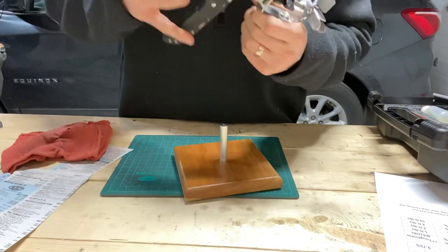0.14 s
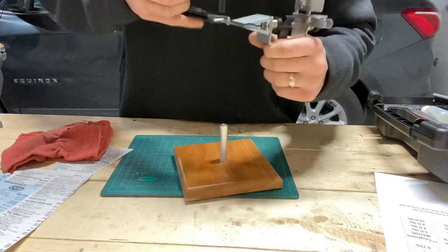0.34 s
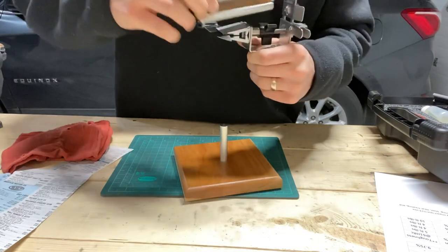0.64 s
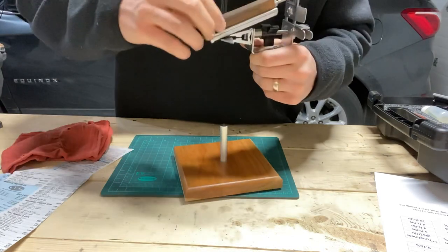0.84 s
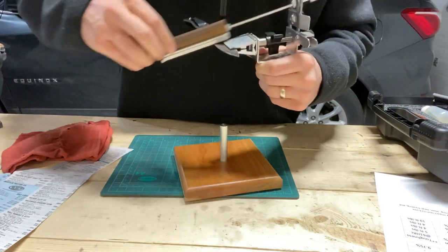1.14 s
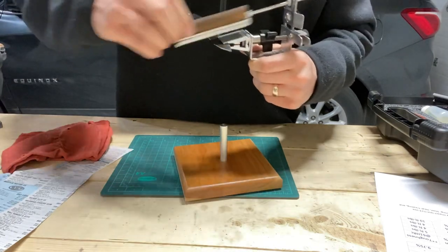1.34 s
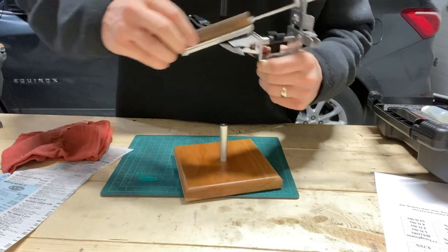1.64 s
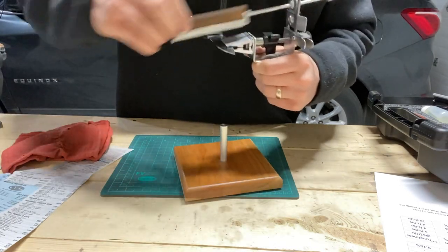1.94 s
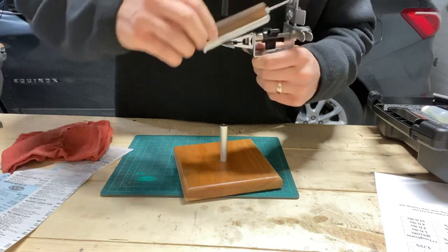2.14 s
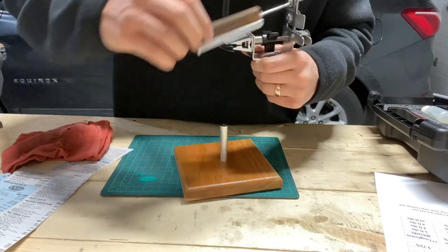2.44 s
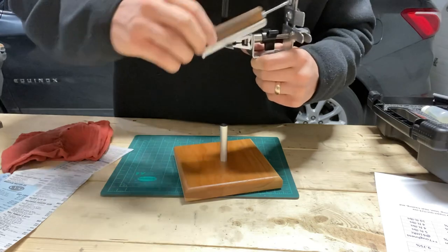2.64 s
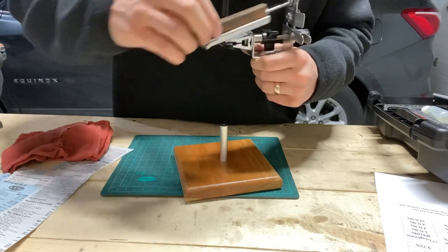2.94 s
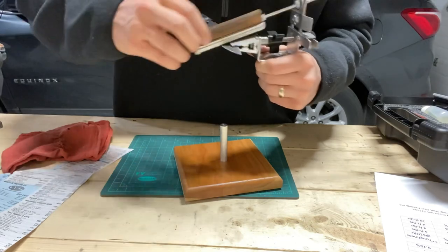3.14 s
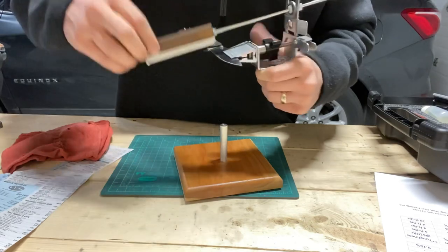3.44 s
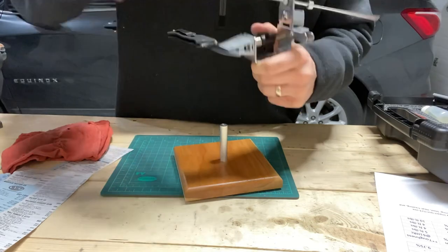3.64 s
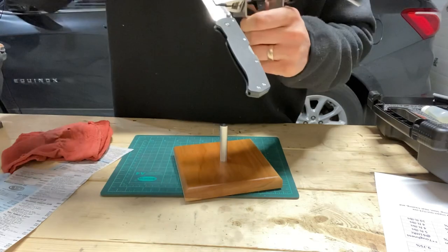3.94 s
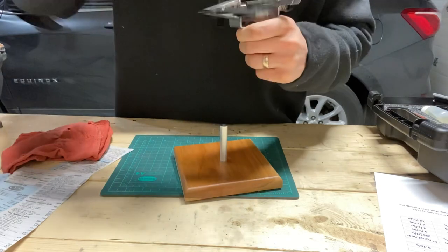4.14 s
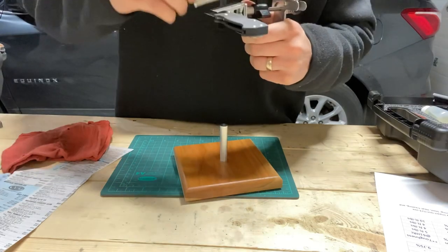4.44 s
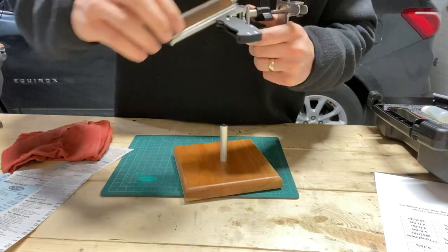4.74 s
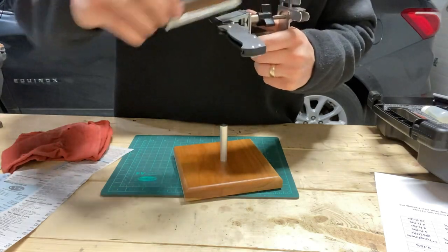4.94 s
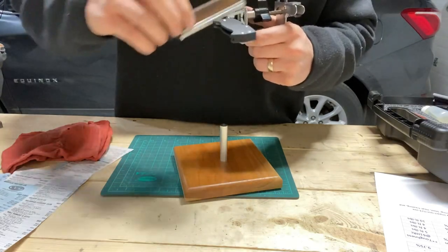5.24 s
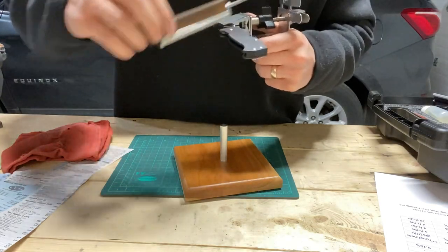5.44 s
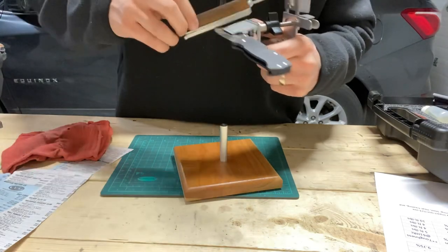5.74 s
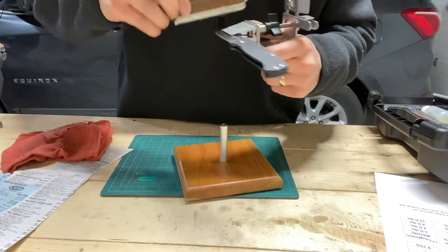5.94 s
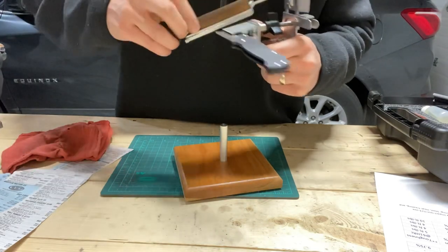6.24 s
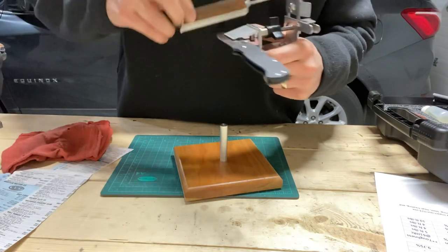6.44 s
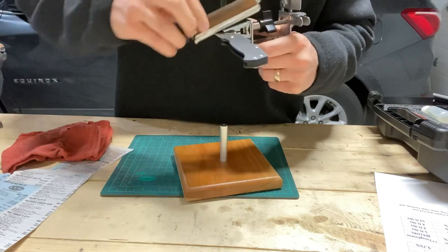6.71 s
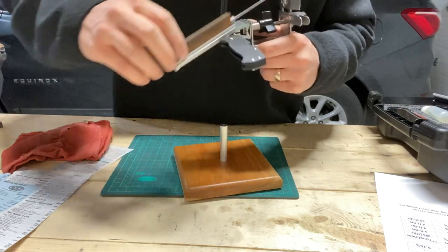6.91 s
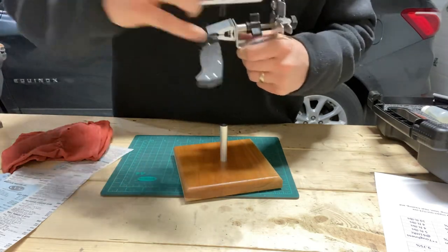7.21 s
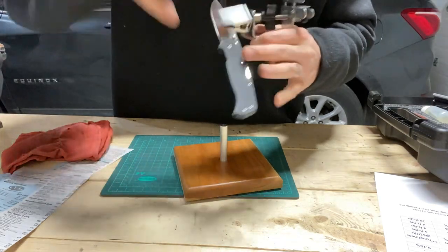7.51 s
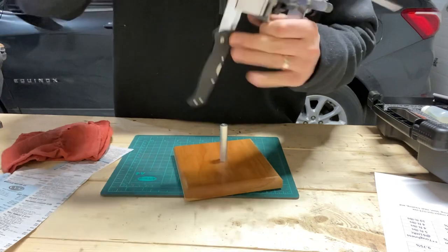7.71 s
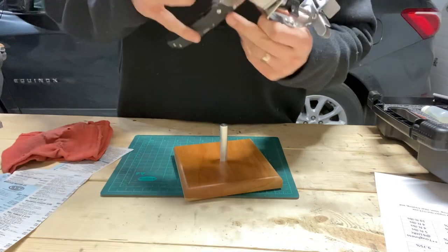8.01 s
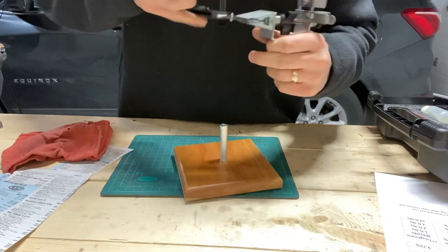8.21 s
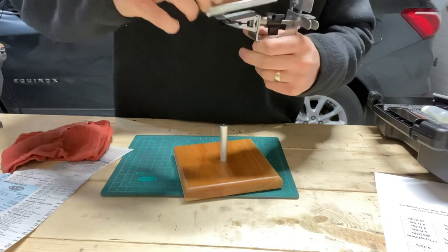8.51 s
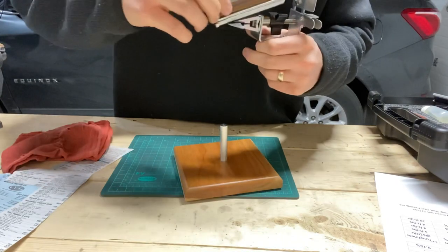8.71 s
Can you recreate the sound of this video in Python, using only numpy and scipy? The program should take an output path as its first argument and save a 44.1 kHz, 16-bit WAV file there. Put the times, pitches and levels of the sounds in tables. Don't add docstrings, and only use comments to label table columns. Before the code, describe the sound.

Hands work a leather strop over a clamped knife at a bench. It opens with sharp metal knocks and small squeaks, then uneven, very short stick-slip scrapes with soft wooden thumps and thin steel hiss between. Mid-way the clamp clinks and scrapes around; dry strokes resume, then it rattles again. Close, crisp phone pickup, short garage reverberation, low distant rumble behind.

```python
import sys
import numpy as np
from scipy import signal
from scipy.fft import rfft, irfft, next_fast_len
from scipy.io import wavfile
from scipy.ndimage import uniform_filter1d

SR = 44100
rng = np.random.default_rng(int(sys.argv[2]) if len(sys.argv) > 2 else 0)


def level_to_linear(level):
    exponent = np.asarray(level, float) / 20
    return 10 ** exponent


def unload_audio(sound):
    columns = np.transpose(np.atleast_2d(sound))
    steps = np.round(np.clip(columns, -1, 1) * 32767)
    wavfile.write(sys.argv[1], SR, steps.astype(np.int16))


N = 391166

# pitch_hz, density_db (per Hz)
HUM_SPECTRUM = [(12, -57.5), (20, -23), (27, -22.5), (43, -10.5), (64, -5.5), (138, -8), (202, -22.5),
                (304, -35.5), (490, -44), (955, -54.5), (1910, -52), (2100, -59), (2670, -54),
                (3000, -62.5), (6000, -82.5), (7800, -106), (13200, -120)]
# pitch_hz, width_hz, level_db
DRONES = [(30.3, 3.2, -81), (59.7, 3.7, -57), (121.6, 6.8, -68), (143.9, 13, -64), (195, 8, -72.5),
          (1760, 9, -100), (2030, 18, -93)]
# start_s, length_s, pitch_hz, width_hz, level_db
SQUEAKS = [(0.005, 0.022, 2760, 695, -60.5), (1.028, 0.018, 6900, 5060, -59),
           (1.074, 0.048, 9150, 1300, -34), (1.075, 0.15, 1625, 161, -47), (0.347, 0.1, 2330, 70, -56.5),
           (2.099, 0.047, 1005, 90, -54), (3.36, .16, 1024, 30, -63.5), (8.205, 0.064, 2330, 80, -55),
           (1.692, 0.084, 1605, 161, -41.5), (1.696, 0.18, 1330, 41.3, -54.5),
           (2.089, 0.14, 1330, 36.7, -64), (2.507, 0.029, 2720, 260, -62), (3.248, 0.1, 1627, 160, -43.5),
           (3.603, 0.073, 2700, 200, -55.5), (3.612, 0.062, 3890, 60, -56.5),
           (0.269, 0.075, 3500, 219, -53.5), (1.52, 0.056, 445, 60.2, -63.5),
           (5.109, 0.045, 460, 79.9, -62.5), (4.945, 0.14, 2580, 400, -63), (5.611, 0.054, 470, 60.3, -61),
           (5.935, 0.044, 2600, 150, -75), (5.999, 0.074, 2760, 300, -59.5), (6.012, 0.037, 1610, 300, -71),
           (5.998, 0.058, 3800, 150, -68), (6.015, 0.05, 854, 119, -75.5), (7.759, 0.015, 1620, 294, -53.5),
           (8.064, 0.25, 3510, 160, -51)]

# start_s, peak_db, body_db (clamp body relative to peak), struck_hz (region struck)
TICKS = [(0.0245, -48.5, -10, 2760), (0.1654, -53.5, -5.5, 885), (0.2164, -49.5, -5.5, 2690),
         (1.556, -56.5, -6.5, 3000), (1.58, -63, -4, 1700), (2.5254, -46, -18.5, 2640),
         (2.7596, -52, -14, 3180), (3.5179, -50, -3.5, 2650), (3.5735, -42.5, -16, 2650),
         (3.6277, -47.5, -15.5, 2640), (3.6644, -62, -11, 3850), (4.0126, -45.5, -8, 950),
         (4.967, -53, -8.5, 2640), (5.008, -48.5, -4.5, 2582), (6.6245, -42, -5, 915),
         (7.3667, -49, -2.5, 3250), (7.48, -59.5, -4, 1570), (7.6249, -39.5, -10, 3020),
         (7.6944, -49.5, -10, 2700), (7.7598, -62, 5.5, 2330), (8.05, -52.5, -3.5, 2800)]
TAPS = [(0.1511, -59, -35, 355), (0.844, -41.5, -13, 440), (1.5226, -48.5, -6, 676),
        (2.2916, -47, -20.5, 356), (2.5093, -40.5, -17, 433), (2.5844, -53.5, 4.5, 390),
        (3.0547, -44, -4.5, 470), (3.5406, -45, -28, 356), (4.5299, -40, -8.5, 566),
        (5.1129, -38.5, -10, 700), (5.6098, -44, -5.5, 470), (5.7575, -48.5, -19.5, 370.8),
        (6.1716, -27.5, -12.5, 820), (6.1862, -27, -23.5, 417), (6.7703, -49.5, -18, 353),
        (7.2716, -46.5, -4, 460), (7.555, -42.5, -12, 2680), (7.9844, -63.5, -13.5, 407),
        (8.681, -71, 2.5, 471)]
KNOCKS = [(0.2563, -37.5, -2, 2330), (0.3499, -16.5, -9.5, 2120), (1.07, -24, -9, 1580),
          (1.6841, -20.5, -8.5, 1570), (2.1002, -29.5, -9, 950), (2.4888, -37, -21.5, 2680),
          (3.2437, -29.5, -11, 430), (3.273, -29, -6, 1740), (3.3507, -17, -17, 1560),
          (3.3632, -39, 0, 1490), (3.7129, -35, -6.5, 1240), (3.7698, -27, -10.5, 1040),
          (4.1868, -32.5, -10.5, 2590), (5.2753, -26, -11, 423), (6.0154, -37, -22, 2680),
          (6.6328, -26, -15.5, 2260), (7.2919, -34, -14, 2650), (7.3105, -32.5, -10.5, 985),
          (7.5691, -27.5, -11, 1760), (8.127, -33.5, -4, 3510), (8.2015, -19, -10, 2120),
          (8.2392, -30.5, -19, 1130)]
CLINKS = [(0.2696, -23.5, -12.5, 2330), (0.3694, -31, -13.5, 2660), (1.2106, -42.5, -18.5, 2630),
          (1.8124, -43.5, -10.5, 1330), (1.8336, -43, -11.5, 1330), (3.3453, -21.5, -12.5, 3270),
          (3.585, -46, -15, 3850), (3.606, -56, -17, 2650), (3.641, -51, -12, 2650),
          (3.693, -45, -17, 2650), (3.678, -35.5, -4.5, 1070), (3.797, -40, -16, 2650),
          (3.83, -41.5, -6.5, 2650), (4.0327, -29, -14, 2340), (4.1522, -24, -12.5, 2020),
          (4.1763, -33.5, -5.5, 2560), (4.7556, -29.5, -8, 444), (5.2335, -43, -14.5, 2530),
          (5.3653, -19, -19.5, 949.6), (5.3686, -20, -12.5, 2290), (6.1562, -47, -8.5, 2680),
          (6.8423, -23.5, -9.5, 1490), (6.9655, -17.5, -18, 2300), (7.259, -25.5, -20.5, 2070),
          (7.6036, -32, -18, 1070), (8.109, -22, -12, 3510)]
# top_db (thin top relative to peak), contact_t60_s,
# focus_db_per_octave (on the region struck)
TICK_KIND = (-20, 0.1, 12)
TAP_KIND = (-11, 0.039, 5.1)
KNOCK_KIND = (-21.5, 0.022, 3.1)
CLINK_KIND = (-6.5, 0.023, 2.6)

# start_s, peak_db, body_db (clamp body relative to peak)
BOUNCES = [(0.2333, -50, -6), (0.2389, -46, -3), (0.2746, -33, 2), (0.2794, -45, 5), (0.2837, -53, -3),
           (0.2885, -54, -3), (0.3112, -56, -5), (0.3604, -35, -11), (0.3756, -41, -6), (0.3868, -42, -6.5),
           (2.1171, -43, -6), (3.3729, -45, -5), (4.1572, -32, -11.5), (4.1658, -35, -9),
           (4.1722, -32.5, -14), (5.3765, -30.5, -14), (6.631, -28, -8.5), (6.9695, -23, -18),
           (6.9771, -33, -8.5), (6.9807, -50, -4), (7.2697, -47.5, 2), (7.6193, -40, -16),
           (8.0961, -44, -3.5), (8.1248, -53, 6), (8.1377, -58, 0), (8.1433, -61.5, -3),
           (8.1526, -49.5, -7), (8.1663, -56, -6.5), (8.2114, -30.5, -8), (8.2253, -46, -0.5)]
FIRST_SLIPS = [(1.0773, -29, -14), (1.081, -18, -22.5), (1.084, -28.5, -15.5), (1.0871, -22, -12.5),
               (1.0914, -34.5, -9.5), (1.0951, -25, -12), (1.1008, -34, -4), (1.106, -24, -12),
               (1.1128, -42, 4), (1.1164, -45.5, 5.5), (1.1234, -41.5, -1.5), (1.1298, -33, -6),
               (1.1355, -31, 1.5), (1.1435, -49, 13.5), (1.148, -40, -4), (1.1553, -45.5, -8),
               (1.1641, -38.5, -4), (1.1683, -45.5, 2), (1.6925, -24, -16), (1.702, -45.5, -13),
               (1.7128, -36.5, -8), (1.7227, -47, -4.5), (1.7282, -41, -2), (1.7382, -42, 5.5),
               (1.7423, -43, -4.5), (1.7469, -56, 6), (1.7569, -44, 10), (3.2471, -38.5, -14.5),
               (3.2541, -34, -16.5), (3.2578, -35, -8), (3.2618, -36.5, -3), (3.2685, -46, 1),
               (3.278, -38, 0), (3.2811, -35.5, -2), (3.287, -44.5, -0.5), (3.2917, -46, 5.5),
               (3.2953, -45.5, 3.5), (3.301, -47, -2), (3.3069, -46.5, 1), (3.3125, -43, 7.5),
               (3.3205, -54, 10), (3.328, -56, -2.5), (3.3352, -48.5, -3.5), (3.3393, -44.5, 1.5)]
SECOND_SLIPS = [(4.7617, -31, -11.5), (4.7674, -36, -3.5), (4.7803, -36, -6), (4.7854, -38, -1.5),
                (4.7916, -38.5, -2.5), (4.7947, -32, -5.5), (4.798, -39.5, 4.5), (4.8048, -18.5, -18),
                (4.8133, -27, -3.5), (4.8209, -21, -21.5), (5.2802, -29, -12), (5.2832, -39, -5),
                (5.2883, -31, -8.5), (5.2946, -40, -13), (5.2986, -37.5, -13), (5.3032, -42.5, 0),
                (5.3112, -35.5, -2.5), (5.3243, -40, -1), (5.33, -40, -2), (5.334, -43.5, 7),
                (5.3393, -38, 4.5), (5.3473, -39.5, -0.5), (5.3538, -42.5, 6), (6.8473, -30.5, -15),
                (6.8526, -19, -26.5), (6.8573, -34.5, -5), (6.8622, -44, -13.5), (6.876, -48.5, 3),
                (6.8881, -48.5, 4.5), (6.8949, -50.5, 13), (6.9042, -50, -2.5), (6.9082, -47.5, 8),
                (6.9131, -53, 9.5), (6.9196, -38.5, -1.5), (6.9272, -40, 4.5), (6.9331, -42, -4),
                (6.9379, -30.5, -10), (6.9433, -37, 0), (6.9556, -39, -9), (6.9605, -43.5, -2.5)]
# struck_hz, top_db, contact_t60_s (shortest is 0.002), focus_db_per_octave
BOUNCE_KIND = (2400, -11.5, -0.07, 3.5)
FIRST_SLIP_KIND = (1610, -23, .008, 8)
SECOND_SLIP_KIND = (1600.5, -21.5, -0.07, 4.5)

# start_s, hardest_s, end_s, landing_db, hardest_db (pressure)
TURNINGS = [
    (.215, .247, 0.46, -65, -55),
    (2.47, 2.498, 2.59, -69.5, -63),
    (3.5, 3.768, 3.85, -70, -56),
    (8.05, 8.096, 8.22, -63, -53.5),
]
FIRST_FACE = [
    (1.07, 1.11, 1.116, -43.5, -42.5),
    (1.684, 1.73, 1.73, -38, -40),
    (3.244, 3.3, 3.347, -44, -47.5),
]
SECOND_FACE = [
    (4.755, 4.817, 4.877, -44, -41.5),
    (5.276, 5.335, 5.387, -38, -42),
    (6.843, 6.94, 6.988, -43, -45),
]
# lift_db (pressure), edge_db and thud_db (each at start, hardest, end),
# focus_db_per_octave (near 1600 Hz), upper_db (parts between 4 and 6 kHz)
TURNING_KIND = (-69, [0.9, -1, -4.5], [-18, -15.5, -16], 0.74, -1.5)
FIRST_KIND = (-50.5, [0, 0.5, -2], [-2, -7, -14], 8.5, -1.5)
SECOND_KIND = (-55.5, [-7.5, 1.5, -7.5], [-7.5, -11.5, -4.5], 4.9, -5)

# start_s, end_s, hiss_db, change_db (over the slide)
SLIDES = [(.4, 0.728, -70.5, -28), (0.845, 1.084, -73.5, 31), (1.23, 1.467, -64.5, -2),
          (1.504, 1.7, -68.5, 17), (1.8, 2.042, -65.5, -7.5), (2.12, 3.032, -70.5, 3.5),
          (3.068, 3.267, -67.5, -7), (3.384, 3.7, -74, -25), (3.84, 4.034, -76, -5),
          (4.206, 4.42, -70.5, -13), (4.461, 4.792, -70, 4.5), (4.857, 5.062, -60.5, 12),
          (5.1, 5.294, -70.5, 12), (5.425, 5.851, -70, -3), (5.91, 6.098, -70, 16), (6.213, 6.372, -67, -2),
          (6.39, 6.605, -74, 7), (6.66, 6.86, -67.5, -6), (7.003, 7.444, -65, -4.5), (7.426, 7.585, -71, 6),
          (7.623, 7.8, -77.5, -33), (7.983, 8.077, -72.5, 0), (8.26, 8.483, -69.5, -15),
          (8.749, 8.946, -71, 21)]
# pitch_hz, width_hz, level_db
HISS = [(5470, 1000, -20.5), (7370, 800, -3.5), (9100, 2500, -6), (10500, 3500, -6.5), (12340, 830, -10),
        (12060, 1100, -15.5)]
# start_s, pitch_hz, level_db
THUMPS = [(.842, 600, -58), (1.517, 1010, -52), (2.099, 795, -48), (2.582, 450, -51.5), (3.053, 520, -56),
          (4.527, 707, -56), (5.108, 820, -51), (5.608, 910, -55), (6.168, 603, -51), (6.63, 822, -55),
          (8.683, 475, -63)]

# pitch_hz, level_db, t60_s
CLAMP = [(985, -4, 0.0049), (1130, -2, 0.011), (1330, -9, 0.45), (1570, -5, 0.0097), (1677, -4, 0.015),
         (1970, -9.5, 0.0051), (2330, -4, .012), (2680, -2.5, 0.018), (3130, -6, 0.0057),
         (3510, -5.5, 0.0061), (3910, -6, 0.011), (4547, -6.5, 0.0047), (4957, -2, 0.024)]
# pitch_hz, level_db, t60_s
STROP = [(260, -2.5, 0.026), (346, -8, 0.018), (444, -2, 0.13), (776, -19, 0.077), (747, -6, 0.024)]
BODY = STROP + CLAMP
BODY_HZ = np.transpose(BODY)[0]
# pitch_hz, width_hz, level_db
EDGE = [(5330, 1800, -6), (6900, 1500, -6), (7290, 630, 1.5), (8270, 800, 2), (8784, 3380, 0),
        (9803, 3330, 0.5)]
EDGE_HZ = np.transpose(EDGE)[0]
# pitch_hz, width_hz, level_db
TOP = [(9350, 730, 8.5), (11050, 1900, 3), (12700, 1400, 2), (13400, 1300, -3), (15200, 1500, -12.5)]
# pitch_hz, width_hz, level_db
THUD = [(287, 65, 1.5), (355, 51, -1.5), (433.3, 62, 7)]
# start_s, upper_over_lower_db
FACING = [(0, 0), (.6, 0), (1.05, 10), (1.9, 10.5), (2.2, 4), (3.2, 9), (3.4, 3), (4.05, -10.5),
          (4.158, -9), (4.168, 9), (4.8, 1.5), (5.3, 1.5), (5.4, 3.5), (6.2, 1), (6.86, 1.5), (7.0, 2),
          (7.6, -1), (8.2, -0.5)]
FACE_SHARE = [-0.038, -.5, -0.97, 0.3, .3, 0]

# pitch_hz, t60_s
GARAGE = [(300, 0.39), (1000, 0.34), (3000, 0.4), (8000, 0.25), (12600, 0.16), (14600, 0.038)]
# pitch_hz, level_db
WALLS = [(500, 1), (2000, 0.5), (2650, -2), (4500, 1), (6200, 1.5), (7350, -5), (8800, -2.5), (12600, 1.5)]
# pitch_hz, lead_rad
LEAD = [(0, 0), (1200, -1), (1600, -.3), (3100, -2.4), (3700, -1.6), (4500, -2.8), (5500, -2.8),
        (6400, -.9), (8000, 0), (9500, 2.2), (9850, 3.05), (11000, 3.22), (11350, 4.3), (12800, 6.2),
        (13600, 6.4), (15000, 9.3), (22050, 12)]
# pitch_hz, level_db
LOUDER = [(100, 1), (500, -1.5), (1300, -0.5), (1600, -6), (2200, -0.5), (3100, -1), (4000, -1.5),
          (5600, -0.5), (7000, -2.5)]
# pitch_hz, likeness (0-1)
SAME_NEAR = [(300, 0.92), (1000, 0.76), (2500, 0.9), (3300, 0.3), (6000, 0.4)]
# pitch_hz, likeness (0-1)
SAME_FAR = [(60, 0.96), (130, 0.88), (300, 0.8), (700, 0), (6000, 0.03)]
# pitch_hz, likeness (0-1)
SAME_TREBLE = [(7200, .98), (10400, .999), (14000, .97)]

RING = 6144
SCRAPED_OVERTONE = 1.65


def evened(x):
    return x / np.sqrt(np.mean(x ** 2) + 1e-20)


def read(points, hz):
    f, value = np.transpose(points)
    return np.interp(np.log(hz + 1), np.log(f + 1), value)


def add(mix, s, sound):
    part = mix[:, max(round(s * SR), 0):][:, :sound.shape[-1]]
    part += sound[:, :part.shape[-1]]


def coloured(x, points):
    size = next_fast_len(len(x))
    gain = level_to_linear(read(points, np.fft.rfftfreq(size, 1 / SR)))
    return irfft(rfft(x, size) * gain, size)[:len(x)]


def resonate(x, peaks, shift_db=0, order=1):
    size = next_fast_len(x.shape[-1])
    hz = np.fft.rfftfreq(size, 1 / SR) + 1
    signs = (-1) ** np.arange(len(peaks))
    gains = level_to_linear(np.array([db for *_, db in peaks]) + shift_db) * signs
    shapes = np.array([(1 + 1j * (hz - f * f / hz) / width) ** -order for f, width, _ in peaks])
    return irfft(rfft(x, size) * (gains @ shapes), size)[..., :x.shape[-1]]


def widths(modes, damping):
    return [(hz, damping * np.log(1000) / (np.pi * t60), db) for hz, db, t60 in modes]


def octaves_off(part_hz, struck_hz, overtone):
    direct = abs(np.log2(part_hz / struck_hz))
    above = abs(np.log2(part_hz / struck_hz / overtone)) + 0.3
    return np.minimum(direct, above)


def facing(s):
    return np.multiply.outer(np.interp(s, *np.transpose(FACING)), FACE_SHARE)


def jolting(count, per_s, spread_db, hiss):
    happens = rng.random(count) < per_s / SR
    jolts = level_to_linear(spread_db * np.minimum(rng.exponential(1, count), 4)) * happens
    puff_s = 0.0024
    grip = signal.lfilter([1], [1, -np.exp(-1 / (puff_s * SR))], jolts)
    return (hiss + evened(grip)) * rng.standard_normal((2, count))


def hum():
    hz = np.fft.rfftfreq(N, 1 / SR)
    rumble = irfft(rfft(rng.standard_normal((2, N))) * level_to_linear(read(HUM_SPECTRUM, hz)), N)
    peaks = [(f, width, db - 10 * np.log10(width / SR)) for f, width, db in DRONES]
    drones = resonate(rng.standard_normal((2, N)), peaks, order=2)
    return level_to_linear(-54.0) * evened(rumble) + drones


def squeaks():
    out, t = np.zeros((2, N)), np.arange(RING * 2) / SR
    for s, length, hz, width, db in SQUEAKS:
        swell = np.sin(np.pi * np.clip(t / length, 0, 1) ** 0.54) ** 2
        tone = evened(resonate(rng.standard_normal((2, len(t))), [(hz, width, 0)], order=2))
        add(out, s, level_to_linear(db) * swell * tone)
    return out


def peaked(x, db):
    loudest = uniform_filter1d(x[0] ** 2, size=88).max(axis=1, keepdims=True)
    return level_to_linear(db)[:, None] * x / np.sqrt(loudest)


def contacts(rows, spread_db, snap, held_hz, overtone, hollow_db, order, size):
    out, t = np.zeros((2, N)), np.arange(size) / SR
    s, db, body_db, struck_hz, top_db, t60, focus_db = np.transpose(rows)
    chatter = rng.standard_normal((2, len(s), size))
    part_luck = rng.standard_normal((len(s), len(BODY)))
    edge_luck = rng.standard_normal((len(s), len(EDGE)))

    first = snap * (np.arange(size) == 30)
    decay = level_to_linear(-60 * t / np.maximum(t60, 0.002)[:, None])
    burst = (chatter * np.minimum(t / 0.00083, 1) + first) * decay

    blade_db = 0.15 * spread_db * edge_luck + facing(s) + hollow_db * (EDGE_HZ < 6000)
    sound = peaked(resonate(burst, EDGE, blade_db, order=2), db - 6.0)

    parts = [(hz, width + held_hz, level + hollow_db * (4200 < hz)) for hz, width, level in widths(BODY, 1.35)]
    away = octaves_off(BODY_HZ, struck_hz[:, None], overtone)
    part_db = spread_db * np.minimum(part_luck, 0.5) - focus_db[:, None] * away
    sound += peaked(resonate(burst, parts, part_db, order), db + body_db + 0.28)

    sound += peaked(resonate(burst, TOP, order=2), db + top_db - 3.0)
    for at, one in zip(s, np.swapaxes(sound, 0, 1)):
        add(out, at - 0.0005, one)
    return out


def struck():
    kinds = [(TAPS, TAP_KIND), (KNOCKS, KNOCK_KIND), (CLINKS, CLINK_KIND), (TICKS, TICK_KIND)]
    rows = sorted((*row, *kind) for table, kind in kinds for row in table)
    return contacts(rows, spread_db=3.5, snap=3.6, held_hz=9, overtone=1, hollow_db=-1.5, order=1, size=RING)


def grabbed():
    kinds = [(FIRST_SLIPS, FIRST_SLIP_KIND), (SECOND_SLIPS, SECOND_SLIP_KIND), (BOUNCES, BOUNCE_KIND)]
    rows = [(*row, *kind) for table, kind in kinds for row in table]
    return contacts(rows, spread_db=3.0, snap=5, held_hz=130, overtone=SCRAPED_OVERTONE,
                    hollow_db=-4.5, order=2, size=RING // 4)


def stroke(row, lift_db, edge_points, thud_points, focus_db, upper_db):
    start, hardest, end, land_db, hard_db = row
    moments = (start, hardest, end)
    t = start + np.arange(RING * 3) / SR
    pressure_db = np.interp(t, moments, (land_db, hard_db, lift_db))
    edge_db = np.interp(t, moments, edge_points)
    thud_db = np.interp(t, moments, thud_points)
    contact = np.clip(np.minimum((t - start) / 0.0014, (end - t) / 0.0069), 0, 1)
    drive = jolting(len(t), per_s=900, spread_db=3, hiss=2.4)

    held = []
    for hz, width, db in widths(CLAMP, 1.9):
        away = octaves_off(hz, 1600, SCRAPED_OVERTONE)
        held.append((hz, width, db - focus_db * away + upper_db * (4200 < hz)))
    blade = []
    for (hz, width, db), turn_db in zip(EDGE, facing(hardest)):
        blade.append((hz, width, db + turn_db + upper_db * (hz < 6000)))

    sound = 0
    for peaks, rel_db in [(held, 0), (blade, edge_db - 1.5), (TOP, edge_db - 14), (THUD, thud_db - 1.5)]:
        pressed = drive * contact * level_to_linear(pressure_db + rel_db - 1.0)
        sound = sound + resonate(pressed, peaks, order=2) / np.std(resonate(drive, peaks, order=2))
    return sound


def strokes():
    out = np.zeros((2, N))
    for rows, kind in [(TURNINGS, TURNING_KIND), (FIRST_FACE, FIRST_KIND), (SECOND_FACE, SECOND_KIND)]:
        for row in rows:
            add(out, row[0], stroke(row, *kind))
    return out


def sliding():
    t, power = np.arange(N) / SR, 1e-12
    for a, b, db, change_db in SLIDES:
        ramp = np.clip(np.minimum(t - a, b - t) / 0.038, 0, 1)
        through = np.clip((t - a) / (b - a) - 0.5, -0.5, 0.5)
        power = power + (ramp * level_to_linear(db + change_db * through)) ** 2
    return np.sqrt(power)


def rub():
    drive = jolting(N, per_s=97, spread_db=4.0, hiss=6.7)
    _, _, z = signal.stft(evened(resonate(drive, HISS, order=2)), SR, nperseg=256)
    blotches = uniform_filter1d(rng.standard_normal(z.shape[1:]), size=5, axis=0)
    blotches = uniform_filter1d(blotches, size=14, axis=1)
    blotchy = signal.istft(z * level_to_linear(6.5 * evened(blotches)), SR, nperseg=256)[1]
    bright = evened(blotchy[:, :N])
    dull = evened(resonate(drive, widths(CLAMP, 7.8)))
    top_hiss = evened(resonate(drive[:, ::-1], TOP[1:], order=2))
    level = level_to_linear(3.0) * sliding()
    bright_gain = np.hypot(level, level_to_linear(-84.0))
    dull_gain = np.hypot(level_to_linear(-16.0) * level, level_to_linear(-83.5))
    return bright_gain * bright + dull_gain * dull + level_to_linear(-87.0) * top_hiss


def thumps():
    out, t = np.zeros((2, N)), np.arange(RING // 4) / SR
    span, sag = 1.73, 0.36
    for s, hz, db in THUMPS:
        u = t * hz / span
        cycles = span * (u - sag * (u - np.log1p(u)))
        swell = np.e * u * np.exp(-u)
        add(out, s, level_to_linear(db) * swell * np.sin(2 * np.pi * cycles) * np.ones((2, 1)))
    return out


def garage(x, gap):
    echoes = np.zeros((2, SR))
    slots = np.arange(gap, SR - 20, 10)
    at = slots + rng.integers(0, 10, (2, len(slots)))
    np.put_along_axis(echoes, at, rng.choice([-1., 1.], at.shape), 1)
    hz, t, z = signal.stft(echoes, SR, nperseg=256)
    tail = signal.istft(z * level_to_linear(-60 * t / read(GARAGE, hz)[:, None]), SR, nperseg=256)[1]
    tail = tail / np.linalg.norm(tail[0])
    turn = 2 * np.pi * 0.7 * np.arange(N) / SR
    a = signal.fftconvolve(x[None] * np.cos(turn), tail, axes=1)[:, :N]
    b = signal.fftconvolve(x[None] * np.sin(turn), tail, axes=1)[:, :N]
    return np.array([a[0] + b[1], a[1] - b[0]])


def ports(pair, likeness):
    size = next_fast_len(N + RING)
    hz = np.fft.rfftfreq(size, 1 / SR)
    a, b = rfft(pair, size)
    same = np.clip(read(likeness + SAME_TREBLE, hz), 0, 1)
    tilt = level_to_linear(read(LOUDER + [(9000, 0.014)], hz) / 2)
    left = a * tilt * np.exp(1j * np.interp(hz, *np.transpose(LEAD)))
    right = (same * a + np.sqrt(1 - same ** 2) * b) / tilt
    return irfft([left, right], size)[:, :N]


def scene():
    machine = hum()
    tool = squeaks() + struck() + strokes() + grabbed() + rub() + thumps()
    room = level_to_linear(-13.0) * garage(coloured(tool[0], WALLS), gap=260)
    return ports(tool, SAME_NEAR) + ports(room + machine, SAME_FAR)


def band_limit(x):
    return signal.sosfilt(signal.butter(12, 16800, fs=SR, output="sos"), x)


def record(dry):
    limited = signal.oaconvolve(dry, signal.firwin(255, 16300, fs=SR)[None], "same")
    return band_limit(limited)


dry = scene()
out = record(dry)
unload_audio(out)
```